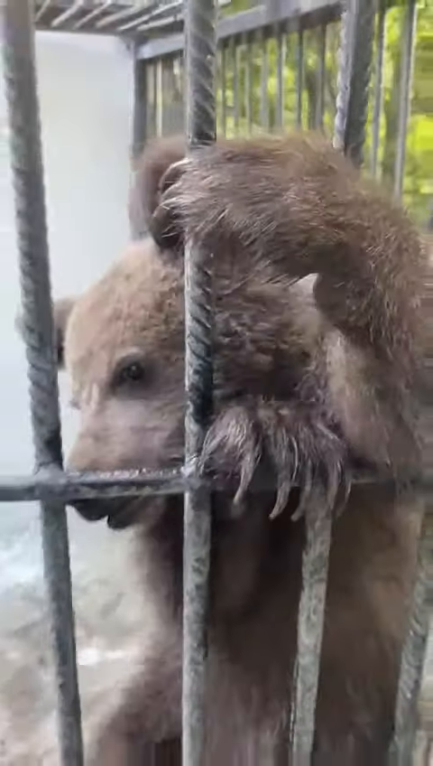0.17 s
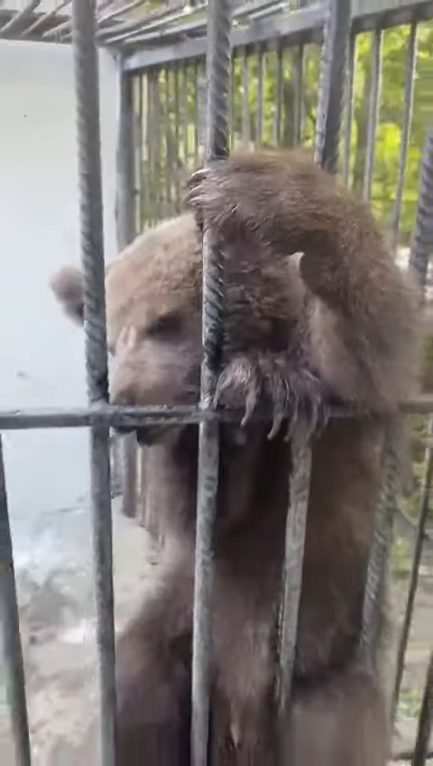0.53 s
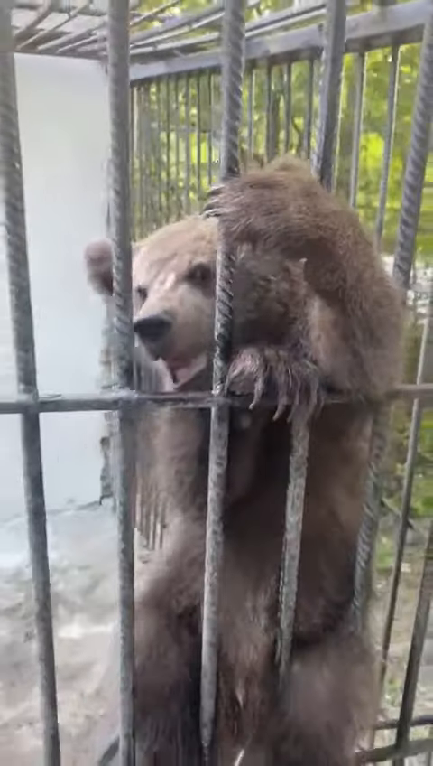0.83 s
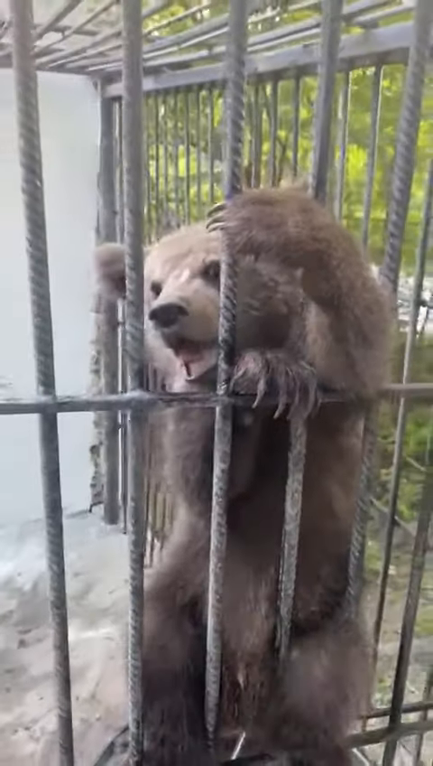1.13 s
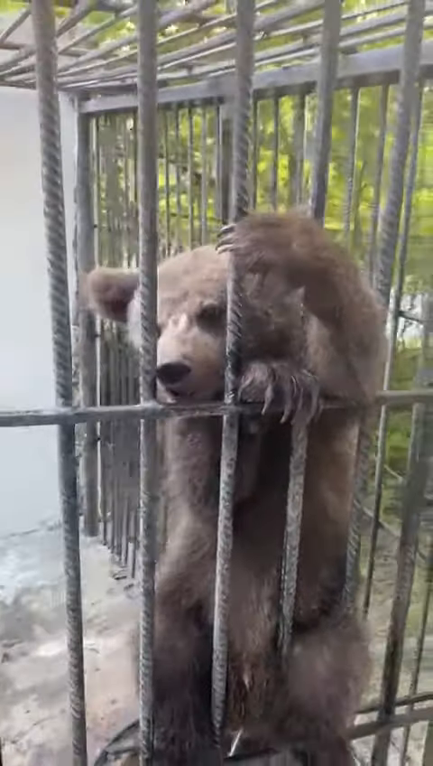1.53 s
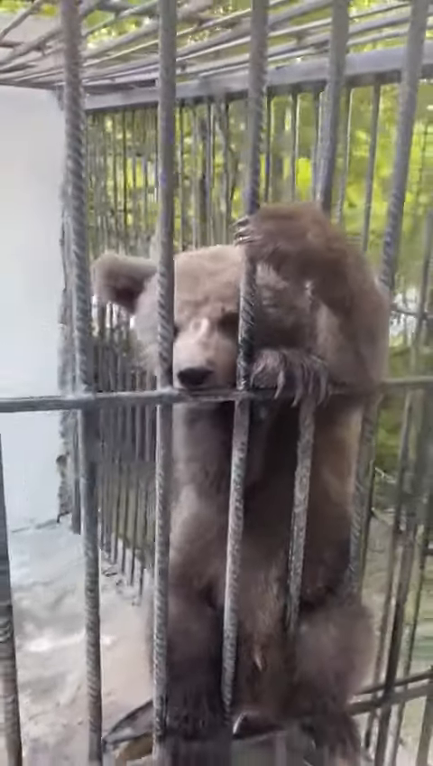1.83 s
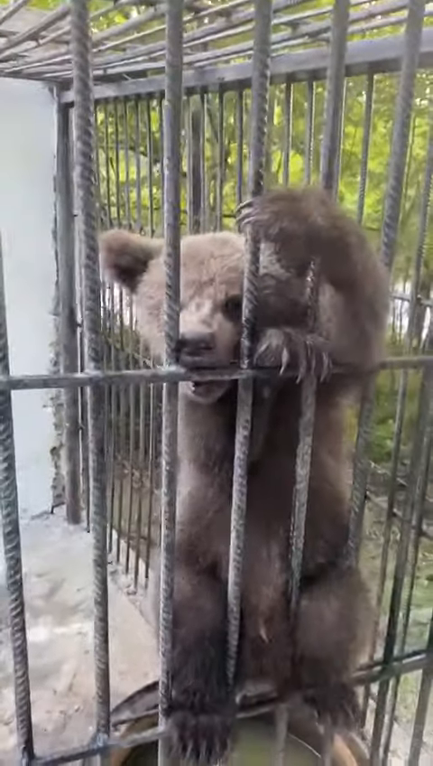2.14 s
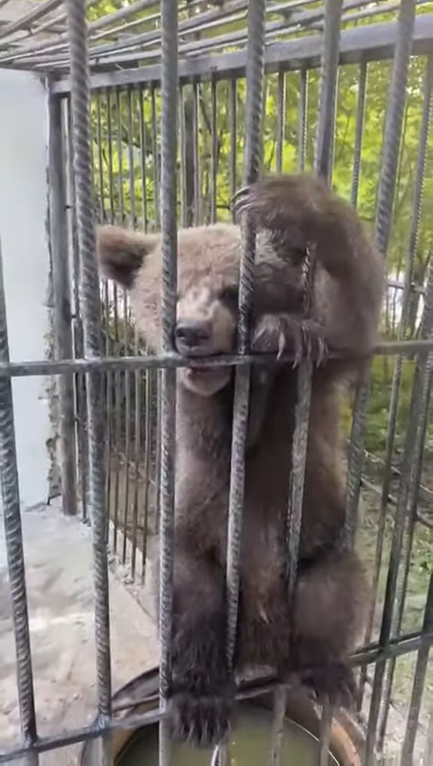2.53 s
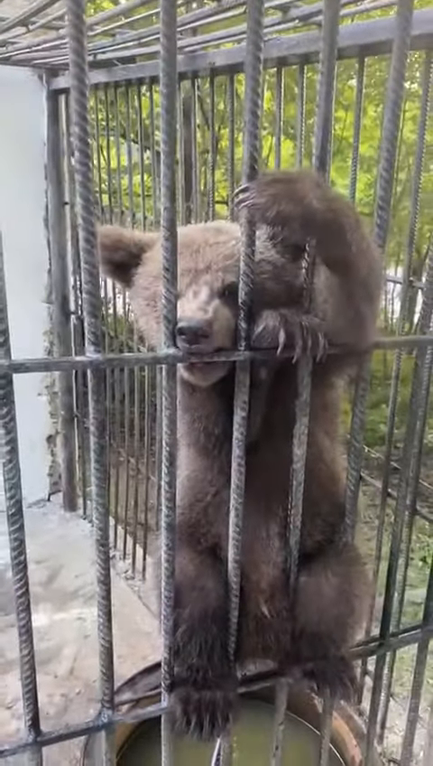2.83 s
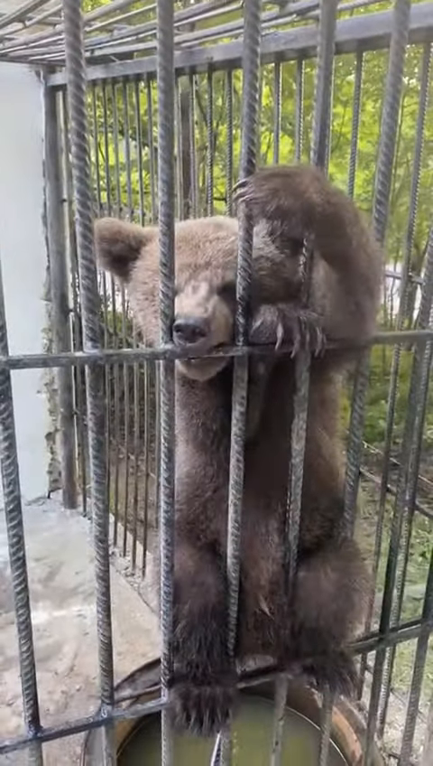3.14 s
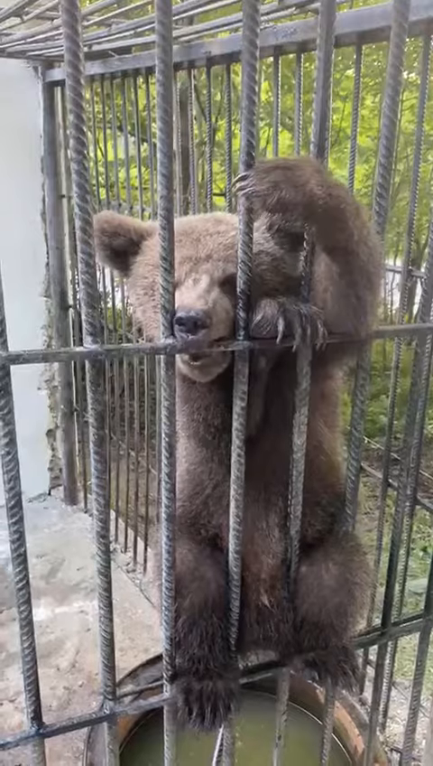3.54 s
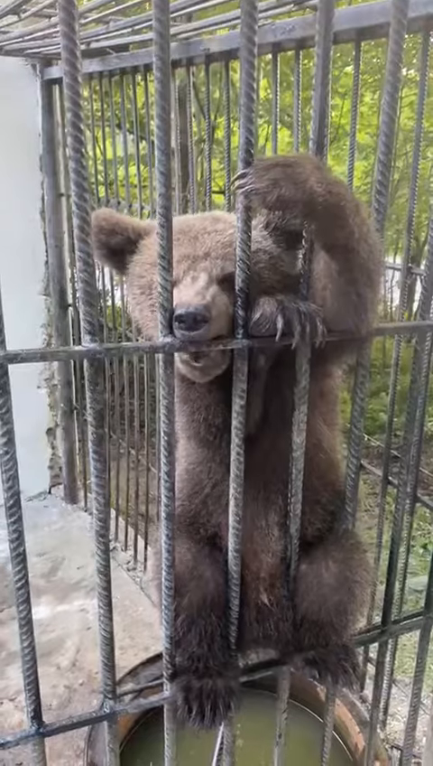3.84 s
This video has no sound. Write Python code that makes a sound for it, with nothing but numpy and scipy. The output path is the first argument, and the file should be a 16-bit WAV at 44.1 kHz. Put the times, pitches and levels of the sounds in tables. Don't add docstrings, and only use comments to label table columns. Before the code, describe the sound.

A bear cub bawls three times close to a phone: a thin squeal and closed-mouth groan opening into a rising bawl, then two louder, rougher cries. Faint breaths, claw ticks, leaves and distant traffic between.

```python
import sys
import numpy as np
from scipy import signal
from scipy.fft import rfft, irfft, next_fast_len
from scipy.io import wavfile
from scipy.ndimage import uniform_filter1d, map_coordinates

SR = 44100
rng = np.random.default_rng(int(sys.argv[2]) if len(sys.argv) > 2 else 0)


def transcribe(u):
    v = np.clip(np.atleast_2d(u).T, -1, 1)
    q = np.round(v * 32767).astype(np.int16)
    wavfile.write(sys.argv[1], SR, q)


def volts_from_db(level):
    exponent = np.asarray(level, float) / 20
    return 10 ** exponent


N = 176400
TIME = np.arange(N) / SR


def unit(x):
    return x / np.sqrt(np.mean(x ** 2) + 1e-20)


def along(points, hz):
    f, value = np.transpose(points)
    return np.interp(np.log(hz + 1), np.log(f + 1), value)


def wobble(rate, size=N):
    knots = rng.standard_normal(int(size * rate / SR) + 4)
    return map_coordinates(knots, [TIME[:size] * rate])


def filtered(x, response):
    m = next_fast_len(x.shape[-1] + 8192)
    spectrum = rfft(x, m) * response(np.fft.rfftfreq(m, 1 / SR))
    return irfft(spectrum, m)[..., :x.shape[-1]]


def ringing(hz, width):
    return lambda f: 1j * f * width / (hz * hz - f * f + 1j * f * width)


# f/Hz, level/dB per Hz
AIR_COLOUR = [(25, -9), (100, -3), (170, -11.5), (463, -15), (950, -9.5), (1590, -16.5), (2700, -25),
              (7000, -53.5)]
# f/Hz, likeness (0-1)
AIR_LIKENESS = [(60, 1), (700, 0.45), (1900, 1), (3000, .5), (5800, 1)]


def far_air():
    z = signal.stft(rng.standard_normal((2, N)), nperseg=512)[2]
    patches = rng.standard_normal(z.shape[1:])
    patches = uniform_filter1d(uniform_filter1d(patches, 6, 0), 14, 1)
    pair = signal.istft(z * volts_from_db(2 * unit(patches)), nperseg=512)[1][:, :N]

    def mid_and_side(hz):
        turn = np.arccos(np.clip(along(AIR_LIKENESS, hz), -1, 1)) / 2
        return volts_from_db(along(AIR_COLOUR, hz)) * np.array([np.cos(turn), np.sin(turn)])

    mid, side = filtered(pair, mid_and_side)
    return volts_from_db(-58.5 + 0.5 * wobble(5.7)) * np.array([mid + side, mid - side]) / np.std(mid)


def moving_air(rows):
    out = 0
    for start, length, db, hz, width in rows:
        noise = unit(filtered(rng.standard_normal(N), lambda f: ringing(hz, width)(f) ** 2))
        swell = np.sin(np.pi * np.clip((TIME - start) / length, 0, 1) ** 0.72)
        out = out + volts_from_db(db + 1.6 * wobble(30)) * noise * swell
    return out


# start t/s, length t/s, level/dB, centre f/Hz, width f/Hz
LEAF_STIRS = [
    (-.3, 2, -72, 4200, 3210),
    (1.233, 1.6, -71, 4200, 3300),
]


def leaves():
    return moving_air(LEAF_STIRS)


# f/Hz, t60 t/s
CAGE_DECAY = [(300, 0.21), (4000, 0.16), (10000, 0.056)]


def cage_answer(near):
    level_db, low_edge_hz = -12, 350
    hz, t, z = signal.stft(rng.standard_normal((2, SR // 3)), SR, nperseg=256)
    fade = volts_from_db(-60 * t / along(CAGE_DECAY, hz)[:, None])
    tail = signal.istft(z * fade, SR, nperseg=256)[1]
    tail = tail / np.linalg.norm(tail[0])
    sent = filtered(near, lambda f: (f / (f - 1j * low_edge_hz)) ** 2)
    late = np.pad(sent, (130, 0))[None]
    return volts_from_db(level_db) * signal.fftconvolve(late, tail, axes=1)[:, :N]


def squeal(rows, tops):
    s, hz, db = np.transpose(rows)
    span = slice(round(s[0] * SR), round(s[-1] * SR))
    t = TIME[span]
    pitch = np.interp(t, s, hz) * (1 + 0.0071 * wobble(150, size=len(t)))
    k = np.arange(1, 13)[:, None]
    shimmer_db = 3.4 * np.array([wobble(60, size=len(t)) for _ in k])
    gains = volts_from_db(along(tops, k * pitch) + shimmer_db)
    overtones = gains * np.sin(k * 2 * np.pi * np.cumsum(pitch) / SR)
    tone = overtones.sum(0) / np.sqrt((gains ** 2).sum(0) / 2)
    out = np.zeros(N)
    out[span] = tone * volts_from_db(np.interp(t, s, db))
    return out


# t/s, f/Hz, level/dB
SQUEAL_GLIDES = [
    [(.085, 753, -65.5), (.13, 770, -55.5), (.2, 736, -55.5), (.216, 520, -53), (.258, 530, -48.5),
     (.266, 807, -57.5), (.284, 804, -52.5), (.292, 607, -43)],
    [(.292, 582, -56.5), (.302, 563, -47.5), (.35, 572, -47), (.398, 592, -43.5), (.407, 676, -49.5),
     (.432, 718, -44), (.446, 777, -61)],
    [(.52, 616, -51.5), (.54, 582, -45.5), (.592, 635, -42), (.6, 645, -59.5)],
    [(2.12, 623, -47.5), (2.141, 569, -34.5), (2.165, 593, -33.5), (2.19, 690, -39.5), (2.2, 823, -31),
     (2.214, 845, -50)],
    [(3.448, 930, -58.5), (3.46, 877, -36.5), (3.49, 908, -28), (3.5, 855, -43.5)],
]
# f/Hz, level/dB
SHUT_COLOUR = [(450, -9.5), (1170, -7), (1710, -29), (2380, -7.5), (3500, -17), (5000, -38), (8000, -47)]
OPENING_COLOUR = [(550, -18), (1170, -8), (1770, -1), (2300, -26), (4000, -25), (5350, -40), (8000, -62)]
OPEN_COLOUR = [(900, -1), (1810, -10), (2720, -28), (3600, -50), (5400, -36), (8200, -62)]


def squeals():
    colours = [SHUT_COLOUR, SHUT_COLOUR, SHUT_COLOUR, OPENING_COLOUR, OPEN_COLOUR]
    return sum(map(squeal, SQUEAL_GLIDES, colours))


# start t/s, length t/s, level/dB, whistle f/Hz, width f/Hz
BREATH_PUFFS = [(.19, .25, -66, 7500, 3500), (1.7, .27, -68, 3500, 3500), (2.86, .15, -68, 2540, 110),
                (2.96, .2, -72, 2380, 160), (2.76, .11, -54, 2000, 3000), (3.18, .12, -73, 5400, 500),
                (3.32, .13, -73, 7000, 1500), (.2, .04, -56, 2800, 1800), (1.4, .12, -66, 3500, 4000)]


def breaths():
    return moving_air(BREATH_PUFFS)


# f/Hz, width f/Hz, level/dB
MOUTH_SHUT = [(121.6, 49, -10.5), (371, 38.6, 3.5), (520, 49, 1.5), (796, 86, -7), (1226, 62, -14.5),
              (1700, 100, -64), (2579, 120, -5), (3820, 250, -18.5), (4400, 900, -28.5), (6900, 380, -48)]
MOUTH_OPENING = [(150, 80, -14.5), (420.4, 46.6, 2.5), (817, 45, 1.5), (1177, 230, -14), (1753, 120, -8),
                 (2175, 200, -11), (3145, 190, -11), (4200, 146, -12), (5490, 230, -35.5),
                 (7400, 680, -33.5), (10700, 860, -34)]
MOUTH_OPEN = [(140, 72, -17), (409.4, 75, -5.5), (922, 66, 3.5), (1315, 150, -7.5), (1841, 134, -6.5),
              (3090, 210, -17), (3990, 172, -15.5), (5190, 330, -32.5), (7500, 800, -35), (9500, 560, -38),
              (10970, 640, -42)]


def throat(source, mouth, rise, mouth_db):
    lift, patchy_db = .028, 1.5
    chest_hz = 600
    muzzle_hz = 4590
    out = 0
    for k, (hz, width, db) in enumerate(mouth):
        places = hz * (1 + lift * np.array([[-1], [1]]))

        def cut(f):
            if hz < muzzle_hz:
                return 1 / (1 + 1.2j * f / muzzle_hz - (f / muzzle_hz) ** 2)
            return ringing(hz, 2 * width)(f)

        low, high = filtered(source, lambda f: ringing(places, width)(f) * cut(f))
        swell_db = patchy_db * (1 + (hz > muzzle_hz)) * wobble(18.96, size=len(source))
        gain = volts_from_db(db + swell_db + mouth_db * (hz > chest_hz))
        out = out + (-1) ** k * gain * (low + rise * (high - low))
    return out


# t/s, extra level/dB
HARD_SLAPS = [(.443, 5), (.489, 1.5), (.526, -0.5), (.625, 2), (0.669, 1), (0.71, 2.5), (.748, 4.5),
              (.791, 2), (.807, 3.5), (.829, 6.5), (.851, 9.5), (1.057, 2.5), (1.087, 5.5), (1.152, 3.5),
              (1.171, 4.5), (1.212, 1.5), (1.297, -1), (1.352, 1.5), (2.224, 1), (2.315, 6.5), (2.502, 6),
              (2.557, 9), (2.588, 4), (2.596, 6), (2.62, 4), (2.643, 4.5), (2.675, 9.5), (2.712, -0.5),
              (3.57, 4.5), (3.59, 5), (3.626, 1), (3.688, 6), (3.725, 1), (3.776, 6), (3.788, 1.5),
              (3.814, 4), (3.867, 1.5), (3.893, 1)]
# f/Hz, width f/Hz
FLAP_SMEAR = [(900, 700), (2000, 1200), (3600, 1500)]
# multiple of flap rate, level/dB
CHEST_HUM = [(1, -24), (2, -41.5), (3, -15.5)]
# multiple of flap rate, level/dB
CHEST_MOAN = [(1, -12), (2, -3.5), (3, -8)]


def growl(rows, mouth):
    s, *cols = np.transpose(rows)
    t = np.arange(round(s[0] * SR), round(s[-1] * SR)) / SR
    size = len(t)
    db, rate, rough = [np.interp(t, s, c) for c in cols]

    closing_s, shutting_s, closing_db = 0.096, 0.043, -15.5
    closing = np.clip((t - s[-1] + closing_s) / shutting_s, 0, 1) * (rate > 120)
    mouth_db = closing_db * closing

    jitter, scatter_db, alternate_db = .14, 2.4, .9
    at = np.flatnonzero(np.diff(np.floor(np.cumsum(rate) / SR)))
    luck = np.clip(rng.standard_normal((len(at), 2)), -1.6, 1.6)
    strong_weak_db = alternate_db * (-1) ** np.arange(len(at))
    strength = volts_from_db(rough[at] * scatter_db * luck[:, 0] + strong_weak_db)
    shift = rough[at] ** 2 * jitter * luck[:, 1] * SR / rate[at]
    at = np.clip(at + shift.astype(int), 0, size - 1)

    slap_share, slap_s = 0.35, 0.007
    for when, extra_db in HARD_SLAPS:
        if t[0] < when < t[-1]:
            nearest = np.argmin(np.abs(t[at] - when))
            at[nearest] = round((when - t[0]) * SR)
            strength[nearest] = volts_from_db(extra_db / 2)
            db = db + slap_share * extra_db * (t > when) * np.exp(-np.abs(t - when) / slap_s)
    flaps = np.bincount(at, strength, size)

    soft_hz, hiss_hz = (2500, 1500) if mouth is MOUTH_SHUT else (9000, 500)
    rasp_db, rasp_s = -.5, .0045

    def flap_edge(f):
        smear = np.prod([1 - 2 * ringing(*part)(f) for part in FLAP_SMEAR], axis=0)
        return smear / (1 + 1j * f / soft_hz)

    puffs = signal.lfilter([1], [1, -np.exp(-1 / (rasp_s * SR))], flaps) + .7
    rasp = filtered(unit(puffs * rng.standard_normal(size)), lambda f: f / (f - 1j * hiss_hz))
    source = filtered(unit(flaps), flap_edge) + volts_from_db(rasp_db) * rough * 2 * rasp

    rise = np.clip((rate - 70) / 100 + .2 * wobble(7.1, size=size), 0, 1)
    voice = throat(source, mouth, rise, mouth_db)
    half_shut = volts_from_db(mouth_db / 2)
    power = uniform_filter1d((voice / half_shut) ** 2, SR // 16, mode="reflect")
    steady = np.sqrt(np.abs(power) + 1e-12)

    turn = 2 * np.pi * np.cumsum(rate) / SR

    def chest(parts, swing_db, speed):
        return sum(volts_from_db(part_db + swing_db * wobble(speed, size=size)) * np.sin(k * turn)
                   for k, part_db in parts)

    hum = chest(CHEST_HUM, 3.8, 29.2) * np.clip(1.7 - 2.22 * rough, .3, 2)
    moan = np.sqrt(closing) * chest(CHEST_MOAN, 6.2, 49.7)
    effort_db = db + rough * 1.6 * wobble(21.6, size=size)
    out = np.zeros(N + SR)
    out[round(s[0] * SR):][:size] = volts_from_db(effort_db) * (voice / steady + hum / half_shut + moan)
    return out[:N]


# t/s, level/dB, flap rate f/Hz, roughness (0-1)
FIRST_GROANS = [
    [(.31, -67.5, 75.6, 0.4), (.35, -47.5, 93.6, 0.4), (.435, -63.5, 75.5, 1.1), (.445, -37.5, 70.3, 0.61),
     (.49, -35, 81, 0.5), (.53, -36, 55, 0.5), (.55, -83, 58, 0.2)],
    [(.59, -73, 75.3, 0.3), (.6, -37, 84, 0.5), (.95, -35, 88, 0.5), (.99, -45.5, 42, 0.46)],
    [(.94, -48, 97.6, 0.66), (.98, -33, 108.3, 0.61), (1.05, -30, 125, 0.4), (1.2, -30, 137, 0.5),
     (1.24, -29, 141.5, 0.4), (1.31, -26.5, 146, 0.3), (1.375, -28.5, 162.6, 0.25), (1.41, -39, 178, 0.42),
     (1.455, -54.5, 150, 0.3)],
]
LATER_BAWLS = [
    [(2.203, -60, 137.8, 0.26), (2.21, -28.5, 135.8, 0.8), (2.25, -22, 150, 0.25), (2.35, -33, 90.18, 0.85),
     (2.46, -27.5, 125.5, .55), (2.7, -28, 139.5, .4), (2.745, -26.5, 164.9, 0.29),
     (2.782, -33.5, 162.5, 0.092), (2.85, -75, 150, 0.28)],
    [(3.489, -52, 140, 0.58), (3.495, -27.5, 140, 0.31), (3.6, -30.5, 90.02, 0.65), (3.68, -35.5, 84.5, .7),
     (3.78, -29, 87.98, .55), (3.875, -34.5, 99.4, 0.72), (3.893, -25, 140, 0.29), (3.97, -25, 140.9, 0.39),
     (4.2, -37, 140, 0.45)],
]


def growls():
    mouths = [MOUTH_SHUT, MOUTH_SHUT, MOUTH_OPENING, MOUTH_OPEN, MOUTH_OPEN]
    return sum(map(growl, FIRST_GROANS + LATER_BAWLS, mouths))


# t/s, peak level/dB, centre f/Hz, width f/Hz
BAR_TICKS = [(0.923, -34.5, 7400, 5100), (1.501, -35.5, 650.4, 350), (1.513, -38, 390, 251),
             (0.705, -40.5, 9500, 3050), (1.704, -49, 750, 400), (1.731, -42, 900, 700),
             (2.005, -59.5, 6500, 2500), (2.019, -42, 2820, 630), (3.262, -62.5, 5700, 880),
             (2.069, -36.5, 6430, 6000), (3.316, -40.5, 4300, 2760)]


def ticks():
    decay_s = 0.0027
    out, t = np.zeros(N), np.arange(SR // 40) / SR
    for s, db, hz, width in BAR_TICKS:
        order = 3 if hz < 1000 else 2
        noise = rng.standard_normal(len(t)) * volts_from_db(-60 * t / decay_s)
        burst = filtered(noise, lambda f: ringing(hz, width)(f) ** order)
        out[round(s * SR):][:len(t)] += volts_from_db(db) * burst / np.abs(burst).max()
    return out


# f/Hz, level/dB
PORT_LEAN = [(260, 0.3), (1100, 0.5), (3000, -2), (4500, -4), (5700, -1), (9000, 4)]
# f/Hz, phase (radians)
PORT_LEAD = [(150, 0), (430, -.45), (1400, -.15), (2300, 0), (2750, 1.1), (4250, .1), (4800, 3.1),
             (5400, 6.2), (6300, 6.3), (7100, 7.55), (8100, 7.7), (8800, 8.4), (9700, 8.4),
                  (10300, 8.6), (12000, 8.7)]


def two_ports(dry):
    half = np.array([[.5], [-.5]])

    def housing(hz):
        lead = along(PORT_LEAD, hz)
        return volts_from_db(half * along(PORT_LEAN, hz)) * np.exp(1j * half * lead)

    return filtered(dry, housing)


def scene():
    near = leaves() + squeals() + breaths() + growls() + ticks()
    return near + cage_answer(near) + far_air()


def top_cut(x):
    return signal.sosfilt(signal.butter(12, 12100, fs=SR, output="sos"), x)


def record(dry):
    ports = two_ports(dry)
    headroom = .3
    mix = ports / (1 + np.abs(ports / headroom) ** 3) ** (1 / 3)
    return top_cut(mix)


dry = scene()
out = record(dry)
transcribe(out)
```